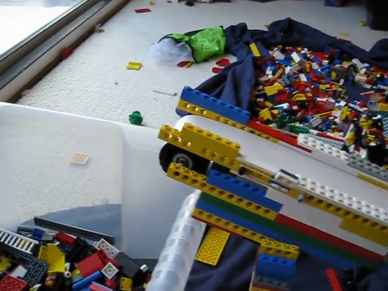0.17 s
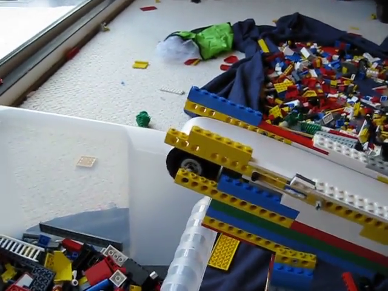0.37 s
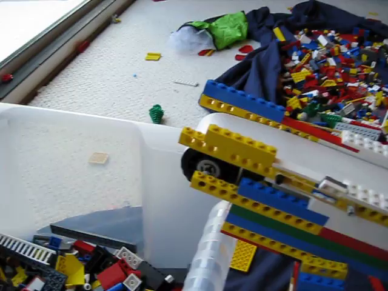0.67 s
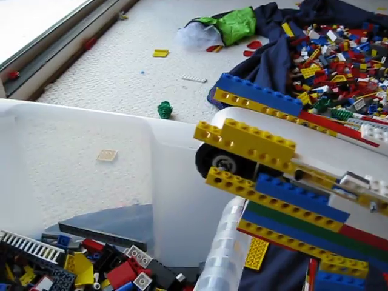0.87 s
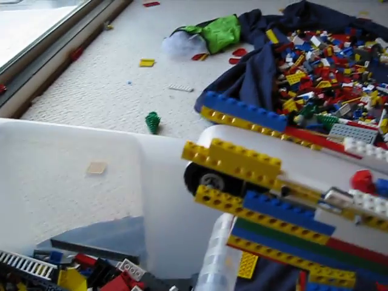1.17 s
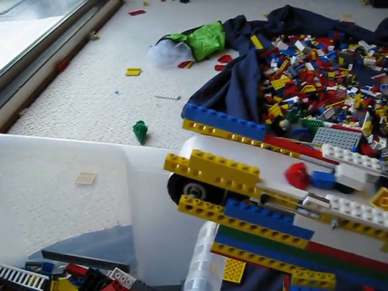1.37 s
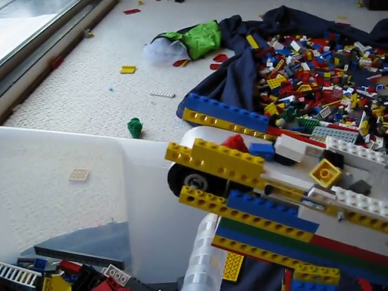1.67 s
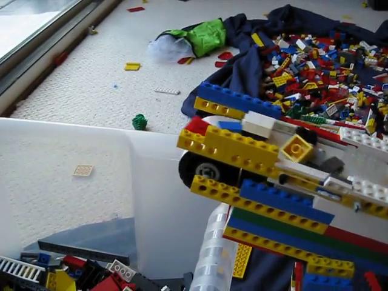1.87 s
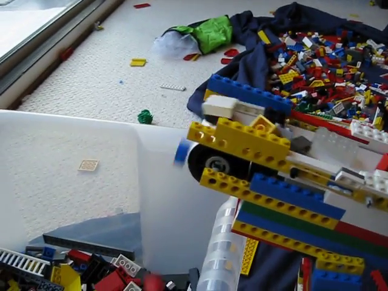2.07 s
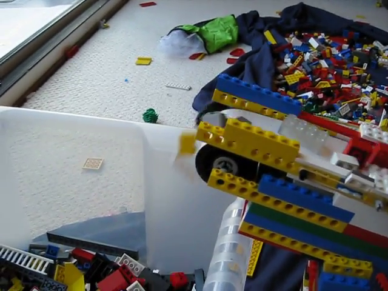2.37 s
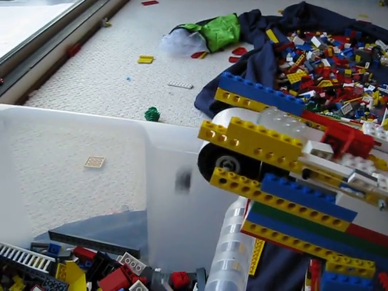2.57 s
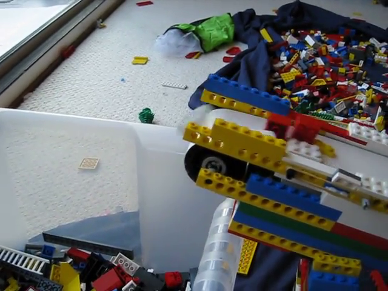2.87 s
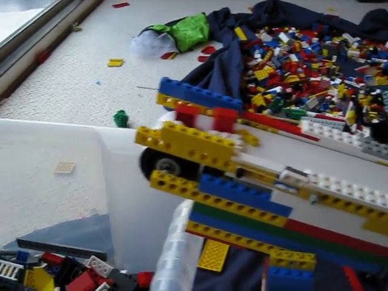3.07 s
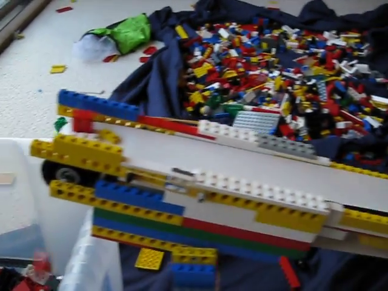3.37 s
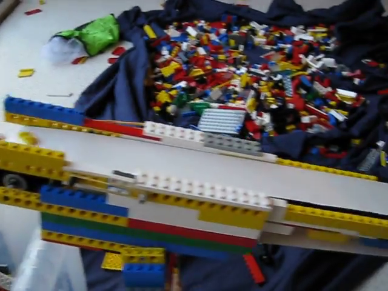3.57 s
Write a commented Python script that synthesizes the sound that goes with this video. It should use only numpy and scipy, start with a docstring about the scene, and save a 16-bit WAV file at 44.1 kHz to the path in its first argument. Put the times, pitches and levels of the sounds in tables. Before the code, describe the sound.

Loose plastic bricks first knock with some room echo at the loading end, pause briefly, then rattle and crack into a nearby bin in dense bursts, over steady faint motor noise; bright, bass-light sound with loud hits squashed.

```python
"""At a small motorised belt: hard plastic bricks ride along and drop into a plastic bin close to the microphone.
Bricks heaped on the belt clack further off, answered by the room; then bricks land close and sharp.
Each blow is a click, a crack of noise and ringing modes; a haze of tiny damped rings rattles in the heap.
Noise through the frame's resonances makes the geared motor hum, over a shaped-noise belt whirr.
Automatic gain ducks after loud hits, and the peaks are clipped."""
import sys
import numpy as np
from scipy import signal
from scipy.fft import rfft, irfft, next_fast_len
from scipy.io import wavfile
from scipy.ndimage import uniform_filter1d, map_coordinates

SR = 44100
rng = np.random.default_rng(int(sys.argv[2]) if len(sys.argv) > 2 else 0)


def store_pcm(level_fs):
    """Save levels as 16-bit WAV."""
    pcm = np.round(np.clip(level_fs, -1, 1) * 32767).astype(np.int16)
    wavfile.write(sys.argv[1], SR, np.atleast_2d(pcm).T)


N = 163611

# ringing modes of a plastic brick, before the scatter from blow to blow: f/Hz, level/dB
BRICK_MODES = [(1270, 6), (1900, 0), (2550, -24), (3200, 3), (4050, 6.5), (4900, 5), (6150, 12.5),
               (9400, -7.5), (12300, 11)]
TREBLE_HZ = 8200  # divides a brick's body from its treble


def amp(db):
    """Decibels to gain."""
    return 10 ** (np.asarray(db) / 20)


def unit(x):
    """Scaled to rms 1."""
    return x / np.sqrt(np.mean(x ** 2) + 1e-20)


def along(points, hz):
    """Interpolates (f/Hz, value) points on a log frequency axis."""
    f, values = np.transpose(points)
    return np.interp(np.log(hz + 1), np.log(f + 1), values)


def wobble(rate):
    """A smooth random curve, rate knots a second."""
    knots = rng.standard_normal(int(N * rate / SR) + 4)
    return map_coordinates(knots, [np.arange(N) * rate / SR])


def filtered(x, response):
    """x times a complex response of frequency."""
    m = next_fast_len(len(x) + SR // 4)
    return irfft(rfft(x, m) * response(np.fft.rfftfreq(m, 1 / SR)), m)[:len(x)]


def band(f, hz, width_hz):
    """Response of one causal resonance."""
    return 1j * f * width_hz / (hz * hz - f * f + 1j * f * width_hz)


def motor():
    """Gear noise rings the frame's resonances, each wavering on its own, over the whirr of the belt."""
    # resonances of the frame: f/Hz, nominal width/Hz, relative level/dB
    frame_modes = [(760.4, 39, -0.5), (1002, 14, -6.5), (1285, 96, 0.5), (1883, 35, -4.5), (2475, 540, -4)]
    # spectrum of belt whirr and hiss: f/Hz, relative level/dB per Hz
    whirr_spectrum = [(40, 0), (350, -4), (520, -12.5), (640, 3.5), (1500, -3.5), (3200, -18), (4500, -9.5),
                      (7000, -18.5), (10000, -15.5), (15500, -19.5)]
    motor_db, whirr_db, waver_db = -37.5, -32, 1
    hum = np.zeros(N)
    for hz, width_hz, db in frame_modes:
        level = amp(db + waver_db * wobble(14))
        # two resonances in a row narrow the band, so each is made wider
        tone = filtered(rng.standard_normal(N), lambda f: band(f, hz, 1.31 * width_hz) ** 2)
        hum += level * unit(tone)
    whirr = unit(filtered(rng.standard_normal(N), lambda f: amp(along(whirr_spectrum, f))))
    return amp(motor_db) * hum + amp(whirr_db + waver_db * wobble(7.9)) * whirr


def room(x):
    """Decaying noise echoes x, each frequency dying at its own speed; a new tail every quarter second."""
    # decay time of the room: f/Hz, t60/s
    decay_times = [(300, 0.67), (2000, 0.54), (12000, 0.2)]
    lumpy_db = 4  # uneven echoes
    wet, step = np.zeros(N + SR), SR // 4
    for i in range(0, N, step):
        hz, t, noise = signal.stft(rng.standard_normal(SR // 2), SR, nperseg=256)
        lumps_db = lumpy_db * rng.standard_normal(len(t))
        decay_db = -60 * t / along(decay_times, hz)[:, None]
        tail = signal.istft(noise * amp(lumps_db + decay_db), SR, nperseg=256)[1]
        echo = signal.fftconvolve(x[i:i + step], tail / np.linalg.norm(tail))
        wet[i + 200:][:len(echo)] += echo  # starts 200 samples late
    return wet[:N]


def rattle():
    """Many tiny contacts among the heaped bricks, each a short damped ring near a brick mode."""
    # dry level of the small contacts in the heap: t/s, rms level/dB
    heap_level = [(0, -38), (1.6, -46.5), (2.169, -39), (2.23, -41), (2.42, -32), (2.63, -34.5), (2.9, -35),
                  (3.02, -52), (3.25, -32.5), (3.63, -34), (3.655, -26.5), (3.7, -34)]
    contacts_per_s, spread_db = 600, 3.5
    s, db = np.transpose(heap_level)
    # columns of luck: moment, choice of mode, detuning, size
    luck = rng.random((int(contacts_per_s * N / SR), 4))
    modes = np.array(BRICK_MODES)[3:]
    choice = (luck[:, 1] * len(modes)).astype(int)
    hz = modes[choice, :1] * (0.879 + 0.26 * luck[:, 2:3])
    t = np.arange(500) / SR
    size_db = np.minimum(-spread_db * np.log(1 - luck[:, 3:]), 11) - 8 * (hz > TREBLE_HZ)
    grains = amp(size_db - 60 * t / 0.0055) * np.sin(2 * np.pi * hz * t)  # t60 is 5.5 ms
    at = (luck[:, :1] * N).astype(int) + np.arange(500)
    contacts = unit(np.bincount(at.ravel(), grains.ravel(), N + 500)[:N])
    dry = contacts * amp(np.interp(np.arange(N) / SR, s, db))
    return dry + .5 * room(dry)


def ring(hz, db, cycles, t):
    """Modes of a struck thing, each at a new level and slightly new pitch; low ones die in fewer cycles."""
    scatter_db = 3
    luck = rng.standard_normal((2, len(hz), 1))
    hz = hz[:, None] * (1 + 0.037 * luck[0])
    level_db = db[:, None] + scatter_db * luck[1]
    decay_db = -60 * t * (hz + 1500) / cycles
    return np.sum(amp(level_db + decay_db) * np.sin(2 * np.pi * hz * t), axis=0)


def clack(pitch_hz, treble_db, thump_db, crack_s, click, sings, hard):
    """A click and crack excite brick modes, treble and bin wall; hard blows are wide and dry, low ones knock."""
    # modes of the bin wall: f/Hz, relative level/dB
    bin_modes = [(340, -13.5), (460, -19.5), (620, -12), (960, -8.5)]
    ring_cycles, bin_cycles = 110, 130  # to die by 60 dB at high pitch
    reach_oct = 0.5  # a blow wakes the modes this near its pitch
    knock_hz = 2400  # lower pitches get a stronger click and a narrower crack
    t = np.arange(SR // 12) / SR
    hz, db = np.transpose(BRICK_MODES)

    # noise bursts for crack and treble, with a soft onset
    burst = amp(-60 * np.maximum(t - crack_s / 6, 0) / crack_s) * rng.standard_normal((2, len(t)))
    burst *= 1 - np.exp(-t / 0.00032)
    knock = (knock_hz / pitch_hz) ** 2
    burst[0, 4] += click * knock

    width_hz = (.5 + 6 * hard / (1 + knock ** 2)) * pitch_hz
    crack = filtered(burst[0], lambda f: band(f, pitch_hz, width_hz) ** 2 / (1 + 1j * f / TREBLE_HZ) ** 4)
    near_db = db - 6 * (np.log2(hz / pitch_hz) / reach_oct) ** 2 - 60 * (hz > TREBLE_HZ)
    body = crack / np.abs(crack).max() + 0.15 * ring(hz, near_db, ring_cycles, t)
    # softer blows sing at their own pitch
    body += sings * (1 - hard) * ring(np.array([pitch_hz]), np.zeros(1), ring_cycles, t)

    treble = 0.044 * ring(hz, db - 60 * (hz < TREBLE_HZ), 2 * ring_cycles, t)
    treble += .5 * filtered(burst[1], lambda f: band(f, 10960, 4640) ** 2)

    wall = ring(*np.transpose(bin_modes), bin_cycles, t)
    thud = rng.standard_normal(len(t)) * np.abs(burst[1])
    wall += 6 * filtered(thud, lambda f: band(f, 653, 1260) ** 2)
    return body + amp(treble_db) * treble + amp(thump_db) * wall


def blows(rows, crack_s, level_db, wet_db, thump_db, click, sings):
    """A table of blows with the room's answer; stronger blows move the bin wall more, even for their level."""
    far_treble_db = -12  # for rows that give no treble
    out = np.zeros(N + SR)
    for s, db, hz, *treble_db in rows:
        hard = np.clip(amp(2 * db - 8.5), 0, 1)
        hit = clack(hz, *treble_db or [far_treble_db], thump_db + db, crack_s, click, sings, hard)
        out[round(s * SR):][:len(hit)] += amp(db + level_db) * hit
    return out[:N] + amp(wet_db) * room(out[:N])


def scene():
    """Motor, rattle, far and near bricks summed at one microphone."""
    # bricks knocking further off, at the loading end: t/s, relative level/dB, pitch f/Hz
    loading = [(0.148, -10.5, 1400), (0.223, -9.5, 4700), (0.234, -6, 4360), (0.319, -15, 4300),
               (0.338, -9.5, 7000), (0.434, -7, 1390), (0.56, -11, 3500), (0.613, -8.5, 3260),
               (0.633, -14.5, 3900), (0.651, -5, 1430), (0.6615, 0, 2140), (0.804, -30, 1430),
               (0.8755, -9, 1410), (0.9045, -3.5, 2250), (1.039, -14.5, 2060), (1.072, -17, 4160),
               (1.219, -16.5, 4300), (1.275, -20, 3180), (1.297, -16.5, 4600), (1.379, -8, 5600),
               (1.514, -7, 1560)]
    # bricks clacking close by, on the belt and in the bin:
    # t/s, relative level/dB, pitch f/Hz, treble level/dB relative to the blow
    landing = [(1.158, -11.5, 4280, 11.5), (1.364, 2, 4000, -7), (1.406, 1, 2450, -3),
               (2.101, -8.5, 4660, 2), (2.124, 5, 2880, 5), (2.144, -8, 5200, -2), (2.203, -15, 5400, 9),
               (2.213, -9, 6950, -1), (2.22, -21, 5300, 20), (2.229, -16.5, 6840, 22.5),
               (2.247, 3.5, 5940, 12.5), (2.328, -12, 5600, 12), (2.347, 0, 5350, 3), (2.355, 4, 5470, 8.5),
               (2.362, -1.5, 4680, -12), (2.366, -6, 5040, 10), (2.463, -13, 6000, 5),
               (2.504, 2, 4400, 9.5), (2.527, -21, 4700, 16), (2.554, -0.5, 2180, -10),
               (2.564, 3, 3960, 9.5), (2.588, -0.5, 4260, -10), (2.602, 0.5, 3210, -20),
               (2.62, -23, 5400, -3), (2.626, -8.5, 5800, 9), (2.64, 1, 6200, -2), (2.713, -4, 7300, 2),
               (2.718, -4, 5800, -2), (2.732, 0, 6440, 2.5), (2.737, -3.5, 3880, -9),
               (2.77, -12, 3940, -21), (2.802, -7.5, 3930, -22), (2.821, -6.5, 4100, 1.5),
               (2.84, -7, 6500, 0), (2.851, -5, 4170, -20), (2.898, -4, 4800, -4), (2.904, -5, 4100, 0.5),
               (2.918, -5, 6500, -6), (3.02, -15.5, 2160, -21), (3.089, 7, 3500, -2),
               (3.141, -1, 5100, 3.5), (3.184, -7, 4440, 2), (3.199, -2, 6420, -18),
               (3.3765, 1.5, 4200, 5.5), (3.398, -7.5, 5200, 0), (3.438, 6.5, 2840, 2.5),
               (3.519, -9, 5030, 9), (3.527, -0.5, 4130, -14), (3.533, 0, 6050, -18),
               (3.594, -2, 4100, -40), (3.621, -2.5, 3840, -8), (3.645, -9, 4480, -18),
               (3.652, -4.5, 4830, -4.5), (3.661, -8.5, 4500, -15), (3.673, -4.5, 4860, -23),
               (3.684, -8.5, 4200, -18)]
    far = blows(loading, crack_s=0.023, level_db=-2, wet_db=-5.5, thump_db=-51, click=9, sings=0.16)
    near = blows(landing, crack_s=0.014, level_db=-7.0, wet_db=-10, thump_db=-11.5, click=2.17, sings=1.0)
    return (far + near + rattle() + motor())[None]


def record(dry):
    """Low cut, housing notch, gain that ducks after peaks and recovers steadily, lopsided clip, band limit."""
    low_cut_hz, top_hz = 1430, 15900
    notch_hz, notch_width_hz = 7905, 1060  # the microphone housing cancels this band
    knee_db, slope, recovery_db_per_s = -17, 0.61, 29
    clip, clip_hard, lopsided = .74, 4, 0.22

    def microphone(f):
        """Response of the low cut and the notch."""
        return (1 - band(f, notch_hz, notch_width_hz)) * (1j * f / (low_cut_hz + 1j * f))

    x = filtered(dry[0], microphone)
    # both averages look back only, so the gain lags the peak
    power = np.abs(uniform_filter1d(x ** 2, 300, origin=149))
    level_db = 10 * np.log10(power + 1e-12)
    recovery_db = recovery_db_per_s * np.arange(N) / SR
    held_db = np.maximum.accumulate(level_db + recovery_db) - recovery_db
    gain_db = uniform_filter1d(-slope * np.maximum(held_db - knee_db, 0), 200, origin=99)
    x = x * amp(gain_db)
    x = x / (1 + np.abs(x / clip) ** clip_hard) ** (1 / clip_hard)
    x = x - lopsided * x ** 2 * np.abs(x)
    return filtered(x, lambda f: (f > 15) & (f < top_hz))[None]


dry = scene()
out = record(dry)
store_pcm(out)
```